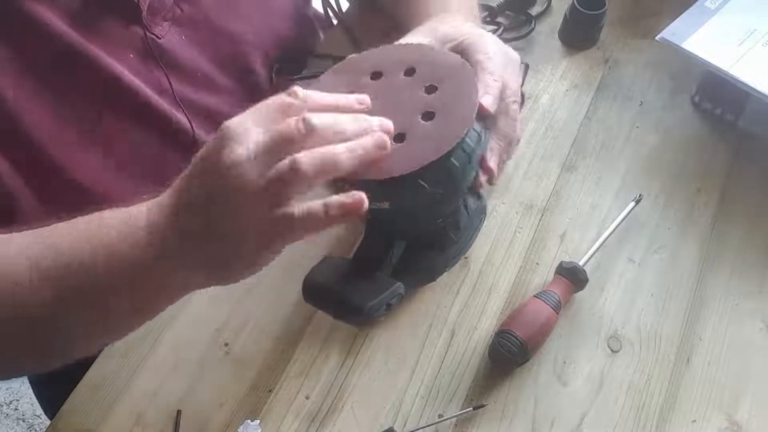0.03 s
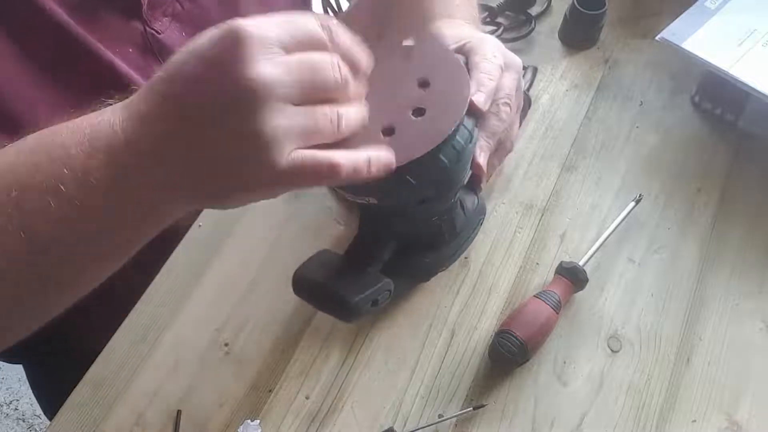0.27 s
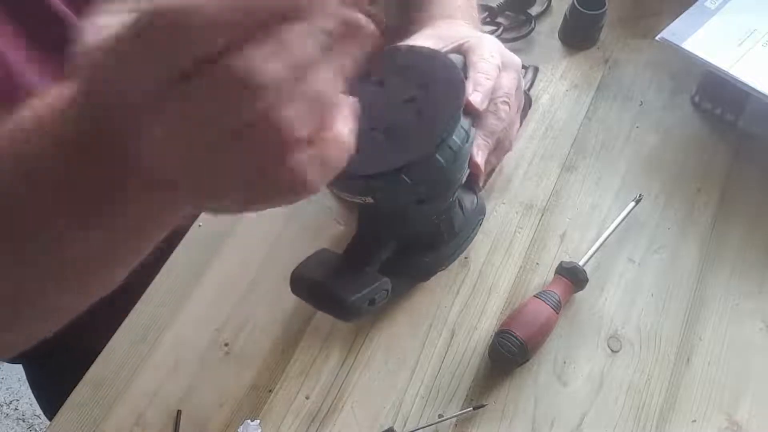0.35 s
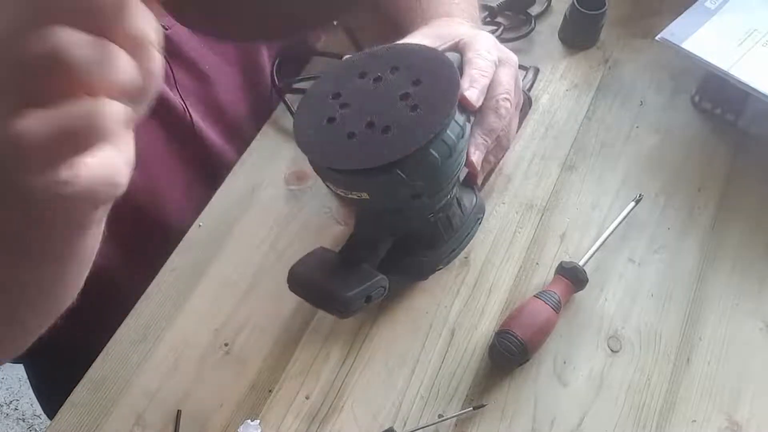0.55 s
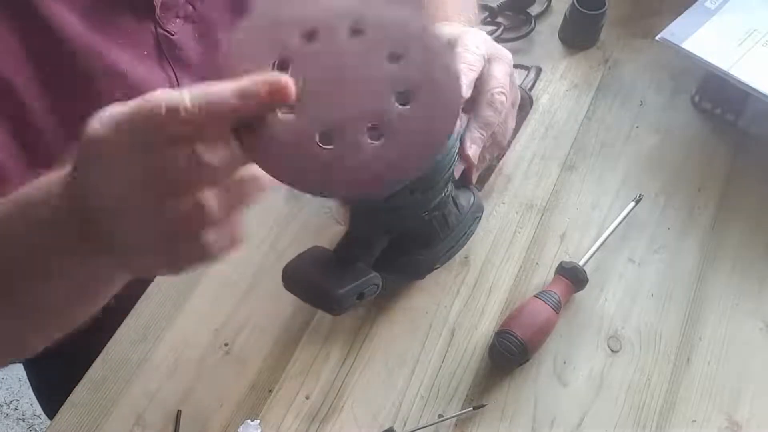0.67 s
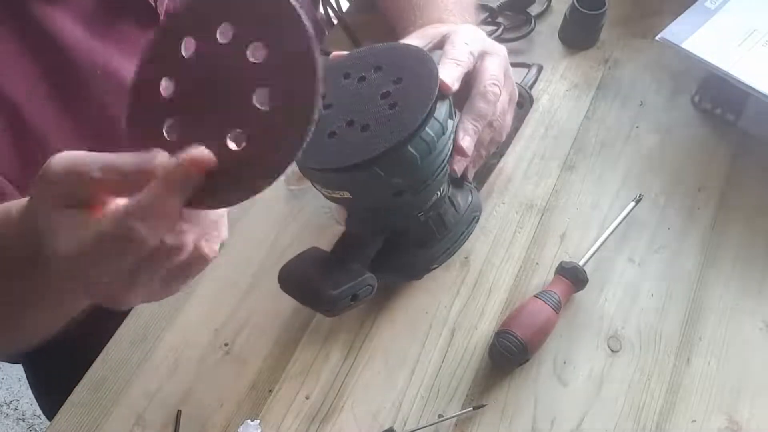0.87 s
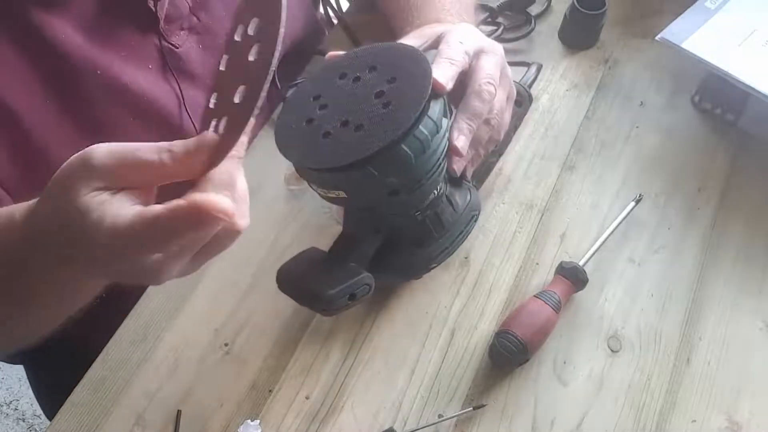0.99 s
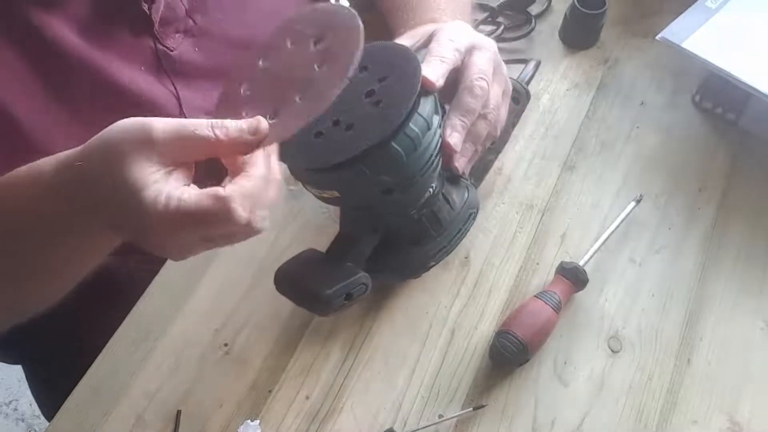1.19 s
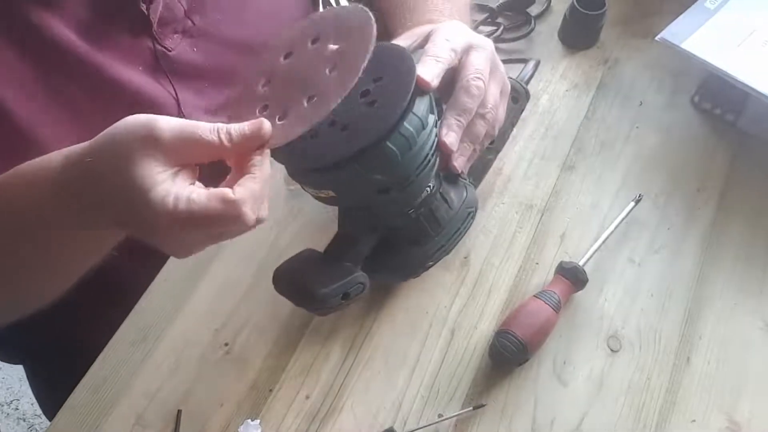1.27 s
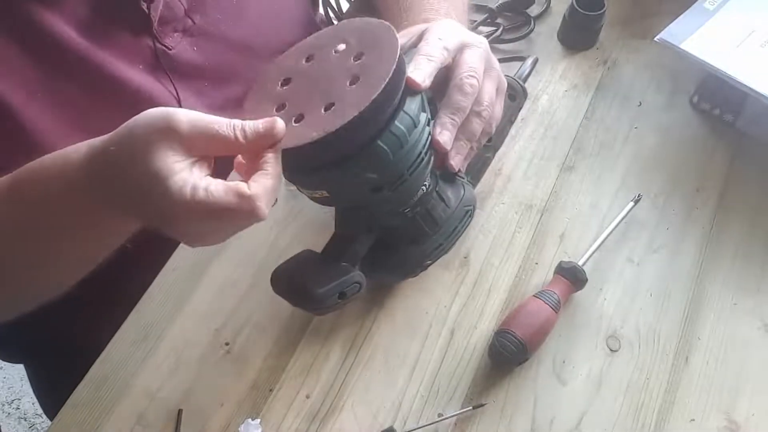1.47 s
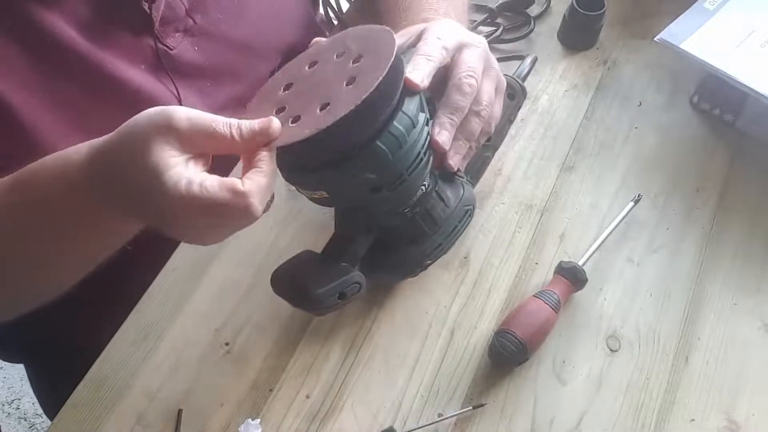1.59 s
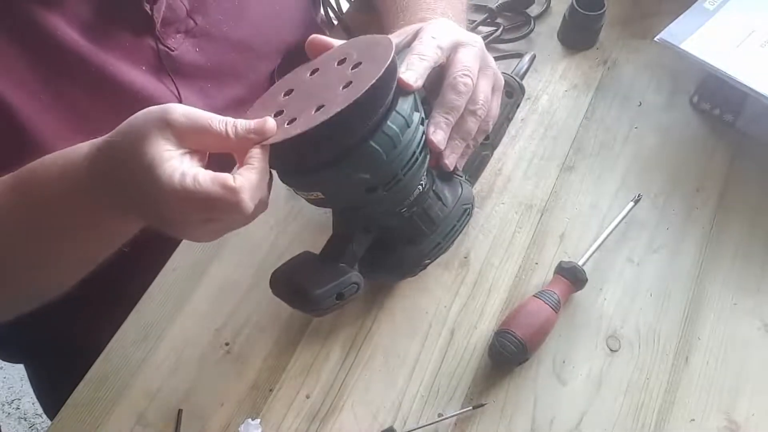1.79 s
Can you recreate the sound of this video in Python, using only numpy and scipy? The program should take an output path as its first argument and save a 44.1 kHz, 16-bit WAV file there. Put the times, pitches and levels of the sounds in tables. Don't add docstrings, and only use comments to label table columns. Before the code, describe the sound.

Close microphone in a small quiet room: hook-and-loop fastening tears in a fast, bright, rising burst, then faint paper clicks and gritty rustles, a sander knocking once on a wooden bench and settling.

```python
import sys
import numpy as np
from scipy import signal
from scipy.fft import rfft, irfft
from scipy.io import wavfile
from scipy.ndimage import uniform_filter1d

SR = 44100
rng = np.random.default_rng(int(sys.argv[2]) if len(sys.argv) > 2 else 0)


def to_linear_factor(level_db):
    exponent = np.asarray(level_db, float) / 20
    return 10 ** exponent


def unload_wav(signal):
    wavfile.write(
        sys.argv[1],
        SR,
        np.round(np.clip(np.atleast_2d(signal).T, -1, 1) * 32767).astype(np.int16),
    )


N = 81585

# [t/s, level/dB, pad flex re level/dB]
PULL = [
    (0, -68, 1.5),
    (0.073, -65.5, -2.5),
    (0.08, -45.5, -10),
    (0.106, -54.5, -3.5),
    (.2, -41.5, -6.5),
    (0.238, -34, -18.5),
    (0.262, -21, -10.5),
    (0.302, -19.5, -7),
    (.311, -27, 4),
]
# [t/s, peak level/dB, f/Hz, length/s]
CLUMPS = [(.0065, -48, 8800, .002), (.014, -46, 4500, .002), (.0165, -43, 8900, .001),
          (.027, -46, 5500, .004), (.033, -48, 9000, .004), (.041, -48, 4900, .004),
          (.0755, -42, 9000, .002), (.1135, -38, 10000, .001), (.1655, -23, 9200, .002),
          (.186, -28, 7500, .0015), (.1966, -21, 9500, .0015), (.2175, -24, 6000, .0015),
          (.2258, -23, 9500, .0015), (.232, -22, 9000, .003), (.2398, -17, 3600, .001),
          (.0605, -40, 8500, .001), (.115, -32, 4400, .0012), (.1181, -23, 8500, .0009),
          (.1326, -31, 5100, .0008), (.1368, -26, 4400, .0015), (.1412, -18, 4300, .0008),
          (.1473, -26, 5900, .0015), (.152, -30, 4500, .0015), (.1617, -22, 6500, .0008),
          (.1632, -20, 4300, .0025), (.1757, -22, 3800, .002), (.1797, -20, 5300, .001),
          (.1897, -19, 8500, .001), (.1948, -21, 5500, .0004), (.1996, -14, 5200, .0013),
          (.2082, -15, 4500, .0007), (.2119, -13, 5800, .0006), (.2135, -18, 4800, .001),
          (.2238, -17, 5400, .0015), (.2384, -14, 9800, .0013), (.245, -16, 8000, .001),
          (.2586, -11, 7900, .001), (.2746, -5, 8200, .0008), (.2804, -6, 9400, .0006),
          (.2921, -5, 8700, .0008), (.2998, -10, 9400, .0008), (.3032, -4, 7900, .0006)]
# [f/Hz, level/dB]
HOOK_SPECTRUM = [(1060, -45.5), (1800, -6.5), (2900, -12.5), (4290, -3.5), (6960, -9), (8590, -5),
                 (11500, -10), (14700, -23.5), (16000, -29.5)]
# [f/Hz, width/Hz, level/dB]
PAD_MODES = [(387.7, 200, 4.5), (612.3, 490, -3.5), (950, 600, -10), (1385, 210, 1.5), (1700, 60, -8)]
# [t/s, peak level/dB, f/Hz, t60/s]
PAPER_TICKS = [(.4988, -62, 11000, .006), (.5135, -60, 6500, .006), (.5158, -48, 8000, .012),
               (.5297, -41, 10500, .007), (.5383, -40, 5800, .009), (.5388, -46, 12000, .02),
               (.5655, -48, 6000, .006), (.5684, -34, 5200, .01), (.678, -56, 9000, .015),
               (.696, -58, 9500, .02), (.749, -43, 7400, .014), (.7535, -47, 6200, .012),
               (.808, -60, 10000, .012), (1.059, -55, 8300, .015), (1.72, -70, 5500, .012),
               (1.7467, -74, 4800, .012), (1.7838, -61, 7300, .012)]
# [peak t/s, swell/s, fade/s, level/dB, centre f/Hz]
FINGER_RUBS = [(0.541, 0.014, 0.025, -62.5, 8930), (.6, 0.049, 0.039, -74.5, 4440),
               (.61, .04, 0.045, -77, 10580), (.78, 0.16, 0.07, -82, 10700),
               (1.3, 0.042, 0.066, -73.5, 12080), (.6, 0.036, .025, -61.5, 1700),
               (1.079, 0.036, 0.02, -75.5, 2450), (.68, 0.018, 0.025, -64.5, 7700),
               (.725, 0.054, 0.022, -69, 3070), (.735, 0.025, .02, -65, 7800),
               (0.75, 0.0021, 0.015, -55.5, 6420), (.825, .04, 0.059, -72, 8700),
               (0.881, 0.0083, 0.033, -54.5, 8080), (0.92, 0.021, 0.017, -46.5, 6300),
               (0.92, 0.019, 0.0092, -56.5, 930), (0.95, 0.02, 0.076, -74.5, 7060),
               (1.061, 0.0044, 0.12, -62.5, 7920), (1.145, 0.027, 0.059, -58.5, 6800),
               (1.199, 0.052, 0.074, -63.5, 3150), (1.315, 0.081, 0.028, -63.5, 8520),
               (1.36, 0.026, 0.13, -78, 8230), (1.15, 0.026, 0.087, -55, 1120),
               (1.3, 0.036, 0.049, -72, 2850), (0.939, 0.063, 0.029, -62.5, 2200),
               (.82, .04, .05, -80.5, 5640), (1.15, .02, .06, -71, 12500)]
# [f/Hz, width/Hz, level/dB]
DISC_MODES = [(770, 200, -8), (2900, 350, -1), (3900, 400, -1), (6500, 500, -3), (9300, 600, -3)]
# [peak t/s, swell/s, fade/s, level/dB]
GRIT_SCRAPES = [
    (.922, .014, 0.0093, -45),
    (1.169, 0.047, 0.088, -71),
]
# [f/Hz, level/dB, t60/s]
BENCH_MODES = [(425, -2, .04), (590, -11, .025), (780, -3, .022), (980, -9, .025), (1550, -13, .01)]
# [f/Hz, level/dB, t60/s]
EDGE_MODES = [(4800, -35, .006), (5600, -33, .006), (8700, -39, .007), (10300, -42, .006)]
# [t/s, level/dB]
ROCKS = [
    (1.136, -41.5),
    (1.158, -57),
    (1.168, -50),
    (1.191, -52.5),
    (1.217, -58),
    (1.233, -58),
    (1.246, -57),
    (1.262, -57.5),
]
# [t/s, level/dB, f/Hz, t60/s]
BUMPS = [(.002, -43.5, 54.2, 0.32), (.2, -52, 52, 0.23), (.005, -41.5, 206, 0.017), (.028, -45.5, 247, .05),
         (0.03, -42, 602, 0.033), (.036, -46.5, 130, 0.067), (.0755, -46, 993, 0.069),
         (.084, -48.5, 1056, 0.08), (.09, -50, 103, 0.1), (.225, -39, 98.4, 0.11),
         (0.515, -51.5, 1880, 0.015), (.664, -37.5, 151, 0.028), (0.693, -33.5, 289, 0.0085),
         (.702, -40.5, 163.7, 0.024), (0.748, -43, 950, 0.057), (.7495, -46, 1170, 0.018),
         (0.749, -44.5, 1700, 0.016), (.753, -49, 1050, 0.035), (0.757, -45.5, 317, 0.034),
         (.9, -54, 54, 0.24), (1.078, -46, 495, 0.046), (1.136, -44, 140.2, 0.1), (.119, -42, 490, 0.11),
         (.146, -32.5, 349, 0.045), (0.298, -26.5, 104.3, 0.081)]
# [f/Hz, t60/s]
ROOM_DECAY = [(100, 0.27), (1000, 0.21), (2500, .27), (4500, 0.24), (8500, .21), (14000, 0.19)]
# [f/Hz, density/dB per Hz]
AIR_SPECTRUM = [(30, -19), (58, 2), (125, -17.5), (900, -15), (1700, -28), (3000, -52.5), (8000, -44.5),
                (12000, -55)]


def evened(x):
    return x / np.sqrt(np.mean(x ** 2) + 1e-20)


def read(points, hz):
    f, value = np.transpose(points)
    return np.interp(np.log(hz + 1), np.log(f + 1), value)


def add(mix, s, sound):
    part = mix[max(round(s * SR), 0):][:len(sound)]
    part += sound[:len(part)]


def resonate(x, hz, width):
    r = np.exp(-np.pi * width / SR)
    poles = [1, -2 * r * np.cos(2 * np.pi * hz / SR), r * r]
    return signal.lfilter([(1 - r * r) / 2, 0, (r * r - 1) / 2], poles, x)


def colour(x, points):
    log_gain = np.log(to_linear_factor(read(points, abs(np.fft.fftfreq(2048, 1 / SR)))))
    taps = np.fft.ifft(np.exp(np.conj(signal.hilbert(log_gain)))).real[:1024]
    return signal.oaconvolve(x, taps / np.linalg.norm(taps))[:len(x)]


def ring(hz, t60, cycles=0.2):
    t = np.arange(0, abs(t60) + 0.0017, 1 / SR)
    onset = 1 - np.exp(-(t * hz / cycles) ** 2)
    return onset * to_linear_factor(-60 * t / t60) * np.sin(2 * np.pi * hz * t)


def uneven(spread_db):
    return to_linear_factor(spread_db * np.minimum(rng.exponential(1, N), 4))


def stroke(peak, swell, fade):
    t = np.arange(N) / SR
    return np.exp(-((t - peak) / np.where(t < peak, swell, fade)) ** 2)


def clump_volley(draw, length):
    u = np.arange(len(draw)) / SR / max(length, .0003)
    dulling = np.clip(.3 * abs(draw[0]), 0, .6)
    volley = signal.lfilter([1], [1, -dulling], draw) * np.sqrt(u) * np.exp(-1.6 * u)
    return volley / abs(volley).max()


def rip():
    snaps_per_s, clump_db, tone_db, clump_pad_db, tone_width_hz = 12000, -5, -7.5, -10.5, 1700
    t = np.arange(N) / SR
    s, db, flex_db = np.transpose(PULL)
    size = uneven(2.5) * rng.choice([-1, 1], N)
    hooks = evened(size * (rng.random(N) < snaps_per_s / SR)) * (t < s[-1])
    snaps = hooks * to_linear_factor(np.interp(t, s, db))
    flex = hooks * to_linear_factor(np.interp(t, s, db + flex_db))
    tones = np.zeros(N)
    draws = rng.standard_normal((len(CLUMPS), 600))
    for (at, peak_db, hz, length), draw in zip(CLUMPS, draws):
        volley = to_linear_factor(peak_db + clump_db) * clump_volley(draw, length)
        add(snaps, at, volley)
        add(flex, at, to_linear_factor(clump_pad_db) * volley)
        tone = resonate(resonate(volley, hz, tone_width_hz), hz, 2 * tone_width_hz)
        add(tones, at, to_linear_factor(peak_db + tone_db) * tone / abs(tone).max())
    pad = np.zeros(N)
    for hz, width, level_db in PAD_MODES:
        pad += to_linear_factor(level_db) * resonate(flex, hz, width) * np.sqrt(SR / 20 / width)
    return colour(snaps, [(300, -34.0)] + HOOK_SPECTRUM) + tones + pad


def ticks():
    width_hz = 2460
    out, t = np.zeros(N), np.arange(1500) / SR
    draws = rng.standard_normal((len(PAPER_TICKS), 1500))
    for (at, db, hz, t60), draw in zip(PAPER_TICKS, draws):
        burst = draw * to_linear_factor(-60 * t / max(t60, .002))
        crack = resonate(resonate(burst, hz, width_hz), hz, 2 * width_hz)
        add(out, at, to_linear_factor(db) * crack / abs(crack).max())
    return out


def rubs():
    octaves_below, octaves_above, widen_per_db, edge_hz = .95, .5, .035, 15300
    out = np.zeros(N)
    hz = np.fft.rfftfreq(N, 1 / SR) + 1
    for peak, swell, fade, db, centre_hz in FINGER_RUBS:
        grit = rng.standard_normal(N) * uneven(1.5)
        bands_db = 3.0 * np.interp(hz, np.linspace(0, SR / 2, 24), rng.standard_normal(24))
        octaves = np.where(hz > centre_hz, octaves_above, octaves_below)
        octaves = octaves * np.exp(widen_per_db * min(db + 67, 11))
        hump = np.exp(-(np.log2(hz / centre_hz) / octaves) ** 2 - (hz / edge_hz) ** 6)
        hiss = evened(irfft(rfft(grit) * to_linear_factor(bands_db) * hump, N))
        out += hiss * to_linear_factor(db) * stroke(peak, swell, fade)
    return out


def scrapes():
    grit = rng.standard_normal(N) * uneven(4.0)
    modes = np.zeros(N)
    for hz, width, db in DISC_MODES:
        modes += to_linear_factor(db) * evened(resonate(resonate(grit, hz, width), hz, 2 * width))
    force = sum(to_linear_factor(db) * stroke(peak, swell, fade) for peak, swell, fade, db in GRIT_SCRAPES)
    return evened(modes) * force


def knock():
    out = np.zeros(N)
    for hz, db, t60 in BENCH_MODES:
        add(out, 1.126, -to_linear_factor(-21 + db) * ring(hz, t60, .25))
    for hz, db, t60 in EDGE_MODES:
        add(out, 1.1256, to_linear_factor(db) * ring(hz, t60, 1.5))
    add(out, 1.1315, -to_linear_factor(-34) * ring(68, .18))
    return out


def rocking():
    rock_hz, width_hz, rise_s = 1030, 330, .004
    out = np.zeros(N)
    u = np.arange(1200) / SR / rise_s
    for (at, db), draw in zip(ROCKS, rng.standard_normal((len(ROCKS), 1200))):
        wood = evened(resonate(resonate(draw, rock_hz, width_hz), rock_hz, width_hz))
        add(out, at, to_linear_factor(db) * wood * u * np.exp(1 - u))
    return out


def bumps():
    out = np.zeros(N)
    for at, db, hz, t60 in BUMPS:
        add(out, at, to_linear_factor(db) * ring(hz, t60))
    return out


def room(x):
    tail_db, near_db, near_s = -15, -11, 0.01
    hz, t, z = signal.stft(rng.standard_normal(SR // 2), SR, nperseg=256)
    tail = signal.istft(z * to_linear_factor(-60 * t / read(ROOM_DECAY, hz)[:, None]), SR, nperseg=256)[1]
    tail[:150] = 0
    near = rng.standard_normal(2000) * np.exp(-np.arange(2000) / SR / near_s)
    near *= rng.random(2000) < .08
    near[:40] = 0
    out = to_linear_factor(tail_db) * signal.fftconvolve(x, tail / np.linalg.norm(tail))[:N]
    return out + to_linear_factor(near_db) * signal.fftconvolve(x, near / np.linalg.norm(near))[:N]


def air():
    frames, hz = N // 512 + 5, np.fft.rfftfreq(2048, 1 / SR)
    a, b, patches = rng.standard_normal((frames, 1025, 3)).T
    patches = evened(uniform_filter1d(uniform_filter1d(patches, 12, 0), 6, 1))
    z = (a + 1j * b) * to_linear_factor(read(AIR_SPECTRUM, hz)[:, None] + 1.5 * patches)
    murmur = signal.istft(z, nperseg=2048, noverlap=1536)[1][:N]
    return to_linear_factor(-59) * evened(murmur)


def scene():
    disc = rip() + ticks() + rubs() + scrapes()
    wood = knock() + rocking() + bumps()
    echoes = room(disc + to_linear_factor(-5) * wood)
    return (disc + wood + echoes + air())[None]


def roll_off(x):
    return signal.sosfilt(signal.butter(12, 16420, fs=SR, output="sos"), x)


def record(dry):
    band = signal.sosfilt(signal.butter(2, 32, "high", fs=SR, output="sos"), dry)
    band = signal.oaconvolve(band, signal.firwin(255, 16200, fs=SR)[None], "same")
    return roll_off(band)


dry = scene()
out = record(dry)
unload_wav(out)
```